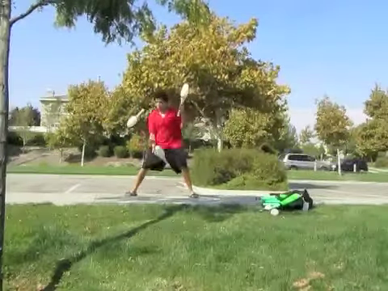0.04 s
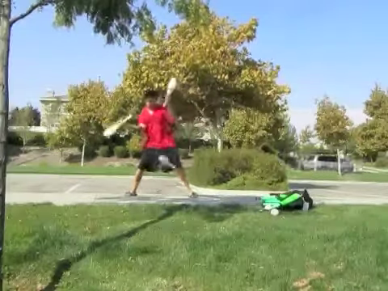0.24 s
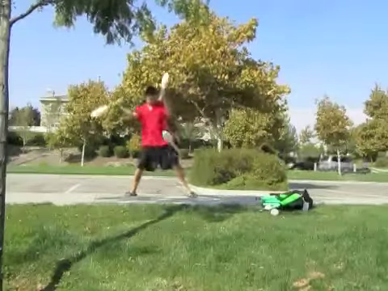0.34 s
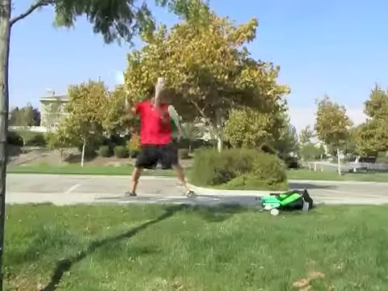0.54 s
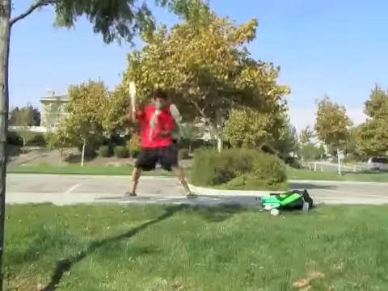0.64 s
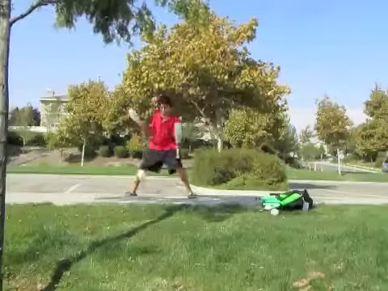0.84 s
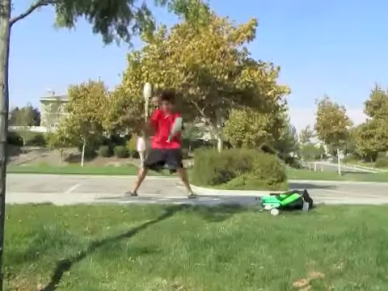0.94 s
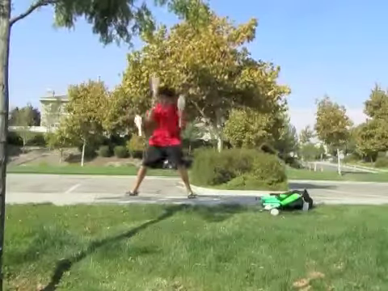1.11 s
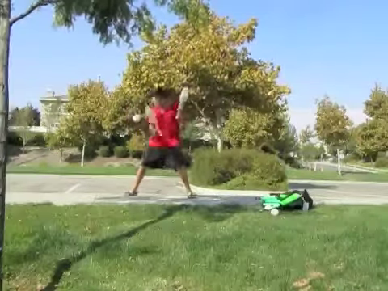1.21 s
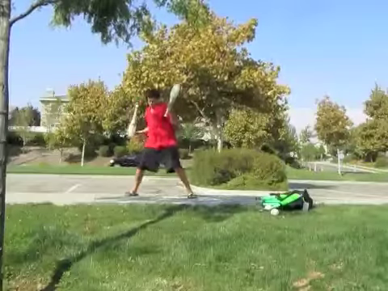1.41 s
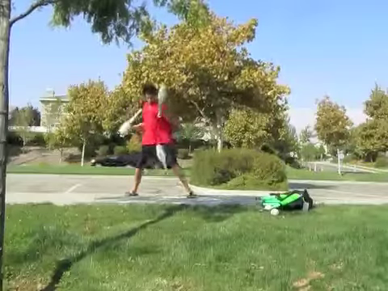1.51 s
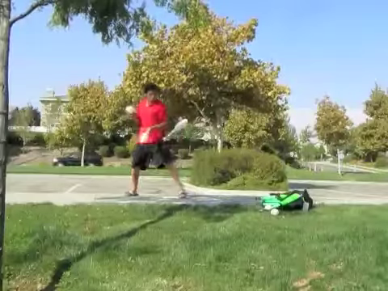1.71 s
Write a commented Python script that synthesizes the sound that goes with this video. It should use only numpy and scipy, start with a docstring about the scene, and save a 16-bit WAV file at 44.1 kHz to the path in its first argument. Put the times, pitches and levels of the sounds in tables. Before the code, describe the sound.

Three sharp, hollow knocks of a plastic club bouncing on pavement, over faint distant traffic.

```python
"""Outdoors on a pavement, a close stereo microphone facing a juggler's hollow plastic club.
The club bounces three times, each bounce two contacts a few ms apart: the hollow body cracks
and rings, the rubber knob ticks and thumps. Trees and far buildings answer faintly over distant
traffic. A shoe scuffs at the start, and one puff of breeze touches the microphone near the end."""
import sys
import numpy as np
from scipy import signal
from scipy.fft import rfft, irfft, next_fast_len
from scipy.io import wavfile
from scipy.ndimage import map_coordinates

SR = 44100
rng = np.random.default_rng(int(sys.argv[2]) if len(sys.argv) > 2 else 0)


def to_wav(sig):
    """Store sig (one row per channel, or 1-D mono) as 16-bit WAV at the path in sys.argv[1].

    Samples outside -1..1 are clipped; the rate is SR.
    """
    pcm = np.clip(np.atleast_2d(sig), -1, 1) * 32767
    pcm = np.round(pcm).astype(np.int16)
    wavfile.write(sys.argv[1], SR, pcm.T)  # frames by channels


N = 77175

# body landings: t/s, crack/dB, ring/dB, hollow note/dB, its f/Hz, two favoured f/Hz, chatter/dB
BODY_HITS = [(0.2227, 19.3, -26, -16, 944, 1910, 2820, 1.3),
             (.9001, 19, -28.5, -26.5, 804, 1660, 3500, 4.2),
             (1.4623, 16.3, -27, -16.5, 905, 3240, 2980, 3.4)]
# knob landings: t/s, tick/dB, tilt/(dB per octave), rattle/dB, thump/dB, its f/Hz, its rise/s, shaft/dB
KNOB_HITS = [(.2290, 7.5, 0.1, -21, -14.5, 306, 0.00365, -26.5),
             (0.8911, 12, 0, -18, -11.5, 305, 0.003, -63), (1.4512, 15, 1.5, -20.5, -14, 306, 0.003, -55)]
# modes of the plastic shell and of the shaft: f/Hz, level/dB, t60/s
SHELL_MODES = [(568, -4.5, 0.034), (1001, -6, 0.066), (1073, -9, 0.046), (1280, -29, 0.026),
               (1400, 2, 0.027), (1630, -1, 0.046), (1880, -3.5, 0.066), (2120, -34, 0.059),
               (2420, -23, 0.02), (2524, 4.5, 0.017), (2670, -3.5, 0.051), (2827, 0, 0.021),
               (2880, 6.5, 0.023), (3160, -4, 0.038), (3235, -5.5, .036), (3463, 4, 0.017),
               (5250, 2.5, 0.017), (5700, -5, 0.035), (6330, -9, 0.027)]
SHAFT_MODES = [(195, -9.5, 0.24), (260.5, 6, 0.098), (377, -6, 0.25), (433, -4, 0.046), (843, 4, 0.076)]
# spectra of the body's crack and buzz, the knob's tick and the grit's rattle: f/Hz, level/dB
CRACK_COLOUR = [(100, -39.5), (450, -8.5), (700, -11), (1050, -8.5), (1600, -1), (2400, -0.5), (3200, -2.5),
                (4100, -18.5), (5600, -13.5), (9500, -22), (13000, -32.5), (16000, -55)]
BUZZ_COLOUR = [(100, -21), (450, -0.5), (650, -7.5), (900, -4.5), (1600, -0.5), (2300, -0.5), (3200, -8),
               (4100, -20), (5800, -15.5), (10000, -20.5), (13000, -36), (16000, -41)]
TICK_COLOUR = [(100, -33), (600, -7), (1100, -10.5), (2000, -9), (3300, -3.5), (4200, -8.5), (6000, -7),
               (8500, -10), (11000, -19.5), (13500, -24.5), (16000, -15)]
RATTLE_COLOUR = [(100, -43), (700, 9.5), (1100, 14), (1700, 1.5), (3300, 5), (4200, -6), (6000, -3.5),
                 (9000, -9), (13000, -22.5), (16000, -45)]
# reflections from bushes, trees and buildings, near to far: delay/s, spread/s, level/dB
REFLECTIONS = [(.038, .018, -23), (.095, 0.011, -38.5), (.141, .015, -33), (.197, 0.022, -39.5),
               (.26, 0.045, -37.5)]
# spectra of the reflections, far engines, far tyres and the shoe: f/Hz, level/dB
REFLECTION_COLOUR = [(100, -4), (400, -12), (1000, -7), (2000, 0.5), (3000, -3), (4000, -2.5), (7000, 2),
                     (11000, -2), (16000, -6)]
ENGINE_COLOUR = [(15, -58), (25, -39), (53, -8.5), (85, -4.5), (149, -3.5), (185, -4), (235, -1),
                 (300, -6.5), (516, -15), (1000, -19), (3000, -89)]
TYRE_COLOUR = [(30, -37), (250, 3), (500, 1), (900, 0.5), (1400, -5), (2200, -13.5), (3100, -19.5),
               (4030, -30.5), (5700, -23.5), (8500, -35.5), (11000, -43.5), (16000, -67)]
SHOE_COLOUR = [(200, -23), (2500, 5.5), (4000, 1), (6000, -3), (9000, -1.5), (12000, -19), (16000, -23)]
# ebb and flow of the traffic: t/s, engine rumble/dB, tyre hiss/dB
TRAFFIC_LEVELS = [(0, -45, -48), (.374, -48.5, -52), (0.812, -47.5, -50), (1.066, -51, -53),
                  (1.238, -49.5, -52.5), (1.5, -50.5, -49), (1.75, -51, -48)]
# likeness of left and right for reflections and traffic: f/Hz, coherence (0 to 1)
REFLECTION_COHERENCE = [(100, 0.92), (1500, 0.99), (5000, 1), (12000, 1)]
TRAFFIC_COHERENCE = [(30, 0.91), (120, 0.86), (300, 0.81), (1000, 0.97), (4000, 0.88), (12000, 0.96)]
# imbalance of the microphone ports: f/Hz, left minus right/dB
MIC_BALANCE = [(25, 5), (60, -3), (125, -1.8), (250, -1.2), (600, -0.45), (12000, 0.5)]
# phase between the ports: f/Hz, left lead/rad
MIC_PHASE = [(20, -0.29), (300, -0.24), (1000, -0.39), (2500, 0.014), (4000, 0.31), (5600, 0.33),
             (10000, .35), (12000, 0.99), (16000, 0)]
# microphone top end, a small peak and a steep fall: f/Hz, level/dB
MIC_TREBLE = [(12500, 0), (13800, 3), (14600, -34), (16500, -24)]

BUILD_S = 0.002  # ringing builds up behind the impact
FAVOUR_DB, FAVOUR_OCTAVES = 7, .06  # lift and width of the modes that the struck spot favours
BUZZ_OVER_RING_DB, BUZZ_T60_S, HOLLOW_T60_S = 2, 0.047, 0.051
CHATTER_DELAY_S, CHATTER_DB_PER_OCTAVE = 0.004, 2.5  # the shell touches again, more thinly
RATTLE_T60_S, GRIT_DB, GRIT_T60_S = 0.038, -38.5, 0.18
TAIL_DB, TAIL_T60_S = -27.5, 0.65
PATCHY_DB, PATCHES_PER_S = 2, 91.7  # unevenness of the echoes
ECHO_REDRAW_S = .6  # time after which the echo is drawn anew
PEAK_LIMIT, LIMIT_HARDNESS, TOP_HZ = .92, 8, 16500


def club_body():
    """Close up, the shell slaps down: a crack, ringing modes, a buzz of denser ones, a hollow note."""
    out = np.zeros(N)
    for s, crack_db, ring_db, hollow_db, hollow_hz, *spots_hz, chatter_db in BODY_HITS:
        favour = lambda hz: sum(bell(np.log2(hz / spot), 0, FAVOUR_OCTAVES) for spot in spots_hz)
        modes = [(hz, db + FAVOUR_DB * favour(hz), t60) for hz, db, t60 in SHELL_MODES]
        shell = amp(ring_db) * ring(modes)
        buzz = amp(ring_db + BUZZ_OVER_RING_DB) * noise(BUZZ_COLOUR) * fade(BUZZ_T60_S)
        hollow = ring([(hollow_hz, hollow_db, HOLLOW_T60_S)])
        crack = amp(crack_db) * click(CRACK_COLOUR)
        chatter = amp(chatter_db) * click(BUZZ_COLOUR, CHATTER_DB_PER_OCTAVE)
        add(out, s, crack + (shell + buzz + hollow) * (1 - fade(BUILD_S)))
        add(out, s + CHATTER_DELAY_S, chatter)
    return out


def club_knob():
    """The rubber knob ticks on the grit and thumps; a square blow sets the shaft humming."""
    out, t = np.zeros(N), clock()
    for s, tick_db, tilt, rattle_db, thump_db, hz, rise_s, shaft_db in KNOB_HITS:
        tick = amp(tick_db) * click(TICK_COLOUR, tilt)
        rattle = amp(rattle_db) * noise(RATTLE_COLOUR) * fade(RATTLE_T60_S)
        squash = (t / rise_s * np.exp(1 - t / rise_s)) ** 2.92  # the rubber squashes and lets go
        thump = -amp(thump_db) * squash * np.cos(2 * np.pi * hz * (t - rise_s))
        grit = amp(GRIT_DB) * noise(RATTLE_COLOUR) * fade(GRIT_T60_S)  # loose grit and trim settle
        shaft = amp(shaft_db) * ring(SHAFT_MODES) * (1 - fade(BUILD_S))
        add(out, s, tick + rattle + thump + grit + shaft)
    return out


def surroundings(x):
    """Bushes, trees and far buildings send back uneven echoes over a thin tail."""
    shapes = [(bell(clock(), delay, spread), db) for delay, spread, db in REFLECTIONS]
    shapes.append((fade(TAIL_T60_S) * (1 - fade(0.035)), TAIL_DB))
    power = sum((amp(db) * unit(shape)) ** 2 for shape, db in shapes) / N
    scatter = rng.standard_normal((2, N)) * np.sqrt(power) * amp(PATCHY_DB * wobble(PATCHES_PER_S))
    response = stereo(scatter, REFLECTION_COLOUR, REFLECTION_COHERENCE)
    return signal.fftconvolve(x[None], response, axes=1)[:, :N]


def traffic():
    """In the distance, engines rumble and tyres hiss, slowly ebbing and returning."""
    out = np.zeros((2, N))
    times, *levels = np.transpose(TRAFFIC_LEVELS)
    for db, colour in zip(levels, (ENGINE_COLOUR, TYRE_COLOUR)):
        wash = unit(stereo(rng.standard_normal((2, N)), colour, TRAFFIC_COHERENCE))
        out += amp(np.interp(clock(), times, db)) * wash
    return out


def shoe_scuff(at_s=.065, width_s=0.014, db=-57):
    """A shoe shifts on the pavement: a faint, brief swell of noise."""
    return amp(db) * bell(clock(), at_s, width_s) * noise(SHOE_COLOUR)


def breeze(at_s=1.51, width_s=.028, db=-47, hz=55):
    """One soft, low puff of air right on the microphone."""
    return amp(db) * bell(clock(), at_s, width_s) * np.sin(2 * np.pi * hz * clock())


def amp(db):
    """Decibels to gain."""
    return 10 ** (np.asarray(db) / 20)


def unit(x):
    """Scale to rms 1."""
    return x / np.sqrt(np.mean(x ** 2) + 1e-20)


def along(points, hz):
    """Interpolate (f/Hz, value) points on a log frequency axis."""
    f, v = np.transpose(points)
    return np.interp(np.log(hz + 1), np.log(f + 1), v)


def filtered(x, response):
    """Filter x by a complex function of frequency."""
    size = next_fast_len(N + SR // 2)
    return irfft(rfft(x, size) * response(np.fft.rfftfreq(size, 1 / SR)), size)[..., :N]


def noise(colour):
    """Coloured noise of rms 1."""
    return unit(filtered(rng.standard_normal(N), lambda hz: amp(along(colour, hz))))


def clock():
    """Seconds at each sample."""
    return np.arange(N) / SR


def fade(t60):
    """Exponential decay, 60 dB in t60 seconds."""
    return np.exp(-np.log(1000) * clock() / t60)


def bell(x, centre, width):
    """A smooth hump of height 1."""
    return np.exp(-.5 * ((x - centre) / width) ** 2)


def wobble(rate):
    """A smooth random curve, rate knots a second."""
    return map_coordinates(rng.standard_normal(N // 20), [clock() * rate])


def click(colour, db_per_octave=0):
    """A coloured impulse, its spectrum tilted about a point near 3 kHz."""
    size = 4096
    hz = np.fft.rfftfreq(size, 1 / SR)
    db = along(colour, hz) + db_per_octave * np.log2((hz + 200) / 3000)
    cepstrum = irfft(np.log(amp(db)))
    cepstrum[1:size // 2] *= 2  # minimum phase: nothing sounds before the contact
    cepstrum[size // 2 + 1:] = 0
    return np.pad(irfft(np.exp(rfft(cepstrum))), (0, N - size))


def ring(modes, scatter_db=1):
    """Damped modes of alternating sign, their levels a little different at every blow."""
    out = np.zeros(N)
    for k, (hz, db, t60) in enumerate(modes):
        gain = (-1) ** k * amp(db + scatter_db * rng.standard_normal())
        out += gain * fade(t60) * np.sin(2 * np.pi * hz * clock())
    return out


def add(track, s, sound):
    """Mix a sound in at s seconds."""
    start = round(s * SR)
    track[start:] += sound[:N - start]


def stereo(pair, colour, coherence):
    """Colour two unrelated signals and blend them as mid and side into left and right."""
    def response(hz):
        angle = np.arccos(np.clip(along(coherence, hz), -1, 1)) / 2
        return amp(along(colour, hz)) * [np.cos(angle), np.sin(angle)]
    mid, side = filtered(pair, response)
    return np.array([mid + side, mid - side])


def scene():
    """The club straight ahead, each bounce with its own diffuse echo, and the background."""
    club = club_knob() + club_body()
    stretch = clock() // ECHO_REDRAW_S
    echoes = sum(surroundings(club * (stretch == k)) for k in np.unique(stretch))
    return club + echoes + traffic() + shoe_scuff() + breeze()


def record(dry):
    """The microphone: two closely spaced, slightly unequal ports, rounded peaks and a band limit."""
    sides = np.array([[.5], [-.5]])
    ports = lambda hz: amp(sides * along(MIC_BALANCE, hz)) * np.exp(1j * sides * along(MIC_PHASE, hz))
    picked_up = filtered(dry, ports)
    rounded = picked_up / (1 + np.abs(picked_up / PEAK_LIMIT) ** LIMIT_HARDNESS) ** (1 / LIMIT_HARDNESS)
    return filtered(rounded, lambda hz: amp(along(MIC_TREBLE, hz)) * (hz < TOP_HZ))


dry = scene()
out = record(dry)
to_wav(out)
```